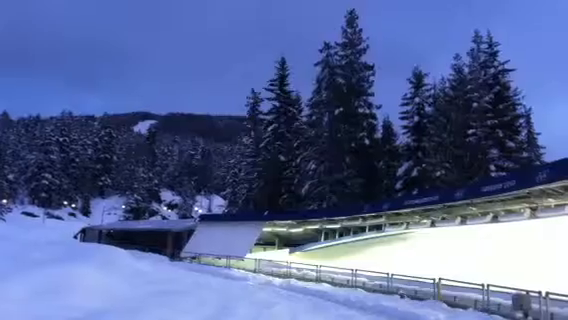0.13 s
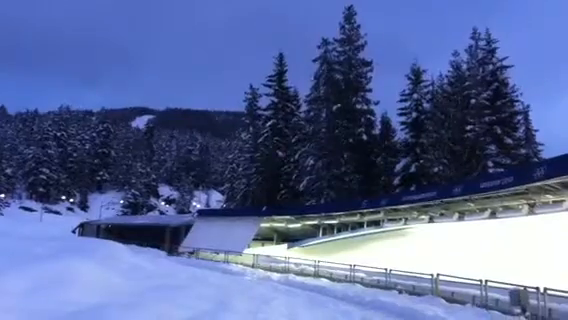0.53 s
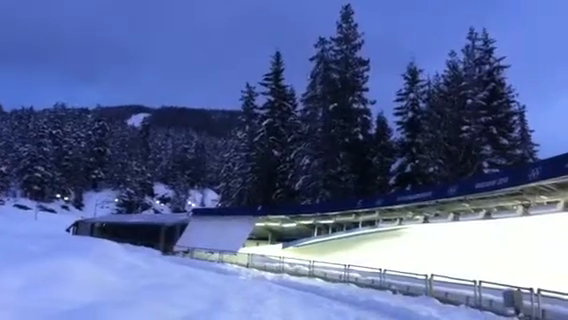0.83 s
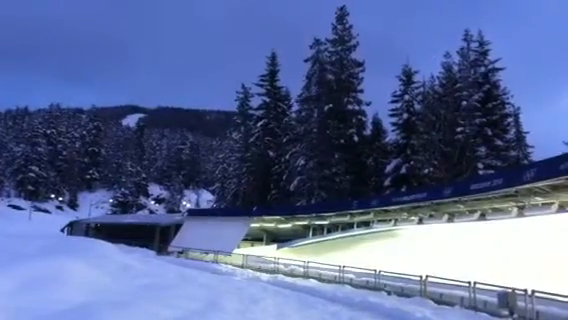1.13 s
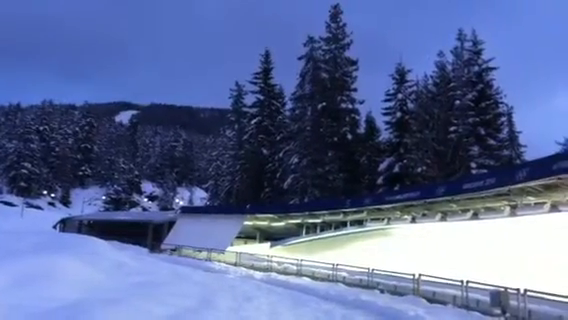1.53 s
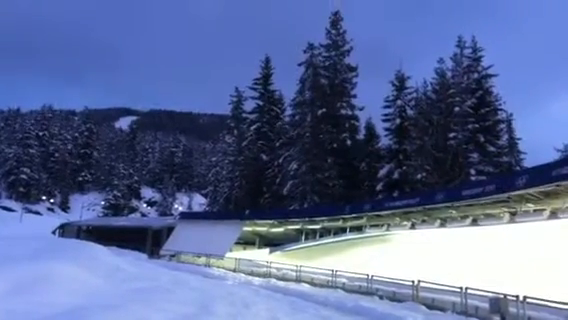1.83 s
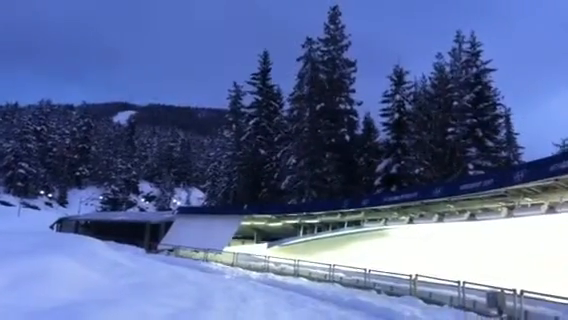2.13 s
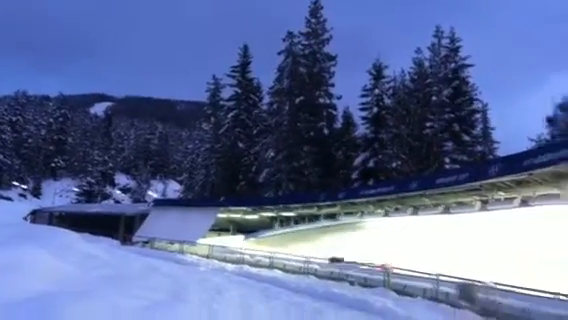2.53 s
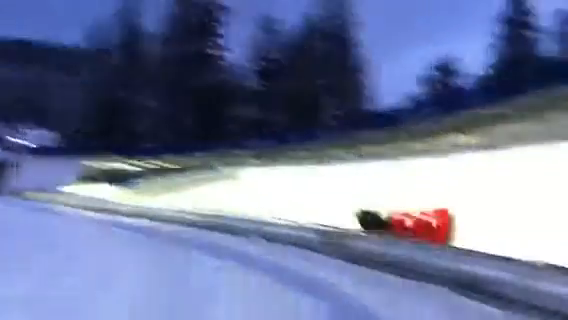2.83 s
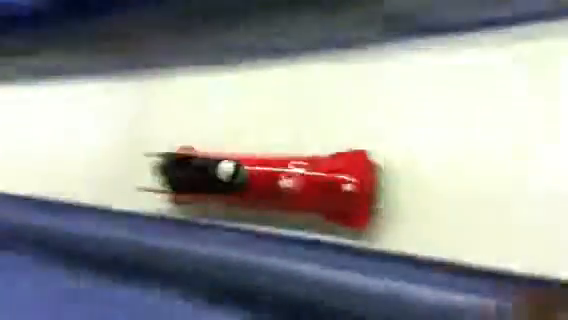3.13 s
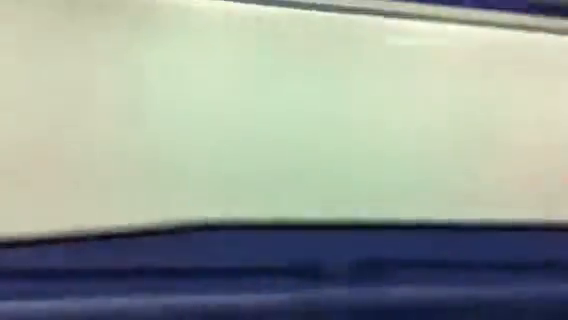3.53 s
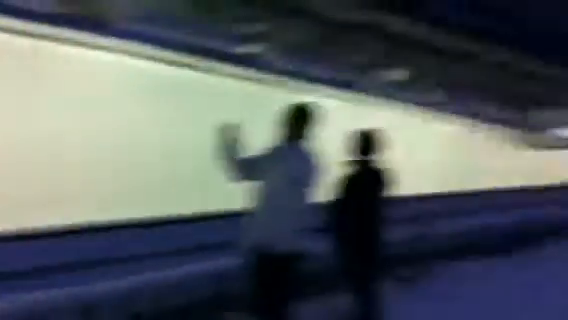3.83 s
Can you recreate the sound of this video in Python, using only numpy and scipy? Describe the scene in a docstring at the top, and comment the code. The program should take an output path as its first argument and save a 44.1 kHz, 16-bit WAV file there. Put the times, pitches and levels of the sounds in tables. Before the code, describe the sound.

A bobsled rumbles down an ice track, growing louder and sweeping past close by.

```python
"""A low, juddering rumble swells as a bobsled runs down a covered ice track, sweeps past and draws away.
Its runners chatter over rough ice: dense small bumps shake hull and track (rumble), grind the steel
(grind, rasp) and shave off ice (scrape, spray). Ridges in the ice jolt the hull into damped thumps.
The Doppler effect lowers the resonances as the sled passes. The microphone adds a thin hiss."""
import sys
import numpy as np
from scipy import signal
from scipy.fft import rfft, irfft
from scipy.io import wavfile
from scipy.ndimage import uniform_filter1d, map_coordinates

SR = 44100
rng = np.random.default_rng(int(sys.argv[2]) if len(sys.argv) > 2 else 0)


def dump(signal):
    """Clip the signal to [-1, 1] and save it as 16-bit WAV at the path in sys.argv[1]."""
    limited = np.clip(np.atleast_2d(signal).T, -1, 1)
    pcm = np.round(limited * 32767).astype(np.int16)
    wavfile.write(sys.argv[1], SR, pcm)


N = 176400
TIME_S = np.arange(N) / SR


def amp(db):
    return 10 ** (np.asarray(db) / 20)

def unit_rms(x):
    return x / np.sqrt(np.mean(x ** 2) + 1e-20)

def curve(rows, column=1):
    """Linear interpolation of one table column over time."""
    return np.interp(TIME_S, [r[0] for r in rows], [r[column] for r in rows])

def coloured(x, spectrum):
    """Spectral shaping by an envelope on a log-frequency axis, at unit rms."""
    points_hz, points_db = np.transpose(spectrum)
    hz = np.fft.rfftfreq(N, 1 / SR)
    gain_db = np.interp(np.log(hz + 1), np.log(points_hz + 1), points_db, -100, -100)
    return unit_rms(irfft(rfft(x) * amp(gain_db), N))

def resonance(x, hz, width_hz):
    """Forced resonance: two cascaded stages, each width_hz wide, follow the curve hz."""
    carrier = np.exp(2j * np.pi * np.cumsum(hz) / SR)
    pole = np.exp(-np.pi * width_hz / SR)
    for _ in range(2):
        x = unit_rms((carrier * signal.lfilter([1 - pole], [1, -pole], x / carrier)).real)
    return x

def with_modes(body, drive, modes, shift, lift_db=0):
    """Modal superposition on a broad body; the reversed drive acts as a second stream of bumps."""
    rings = sum(amp(db + lift_db) * resonance(drive[::-1], hz * shift, width) for hz, width, db in modes)
    return (body + rings) / np.sqrt(1 + sum(amp(db) ** 2 for _, _, db in modes))

def wobble(hz):
    """Random modulation: noise low-passed at hz, at unit rms."""
    b, a = signal.butter(2, hz, fs=SR)
    return unit_rms(signal.lfilter(b, a, rng.standard_normal(N)))

def bumps(per_s, spread_db):
    """Shot noise: rough ice gives irregular impulses of uneven size."""
    size = amp(spread_db * np.minimum(rng.exponential(1, N), 4)) * rng.choice([-1., 1.], N)
    return unit_rms(size * (rng.random(N) < per_s / SR))

def patchy(x, frames, bins):
    """Spectral modulation: louder and softer patches, 1 dB rms, over time and frequency."""
    spectra = signal.stft(x, nperseg=512, noverlap=384)[2]
    field = rng.standard_normal(spectra.shape[::-1]).T
    patch_db = unit_rms(uniform_filter1d(uniform_filter1d(field, bins, 0), frames, 1))
    return unit_rms(signal.istft(spectra * amp(patch_db), nperseg=512, noverlap=384)[1][:N])

def doppler(speed_m_s=26.1, nearest_m=4.46, nearest_s=3.45):
    """Doppler effect: the frequency ratio is above 1 on approach and below 1 in retreat."""
    along_m = speed_m_s * (TIME_S - nearest_s)
    receding_m_s = speed_m_s * along_m / np.hypot(along_m, nearest_m)
    return 1 / (1 + receding_m_s / 331)

def slowed(x, shift, share):
    """Time dilation: the whole spectrum sinks by a share (0-1) of the Doppler slide."""
    return map_coordinates(x, [np.cumsum((shift / shift[0]) ** share)], order=3)

def microphone_hiss(level_db=-71):
    """Self-noise: the microphone adds a steady white floor."""
    return amp(level_db) * rng.standard_normal(N)

# Spectrum of the ice spray: frequency_hz, gain_db
SPRAY_SPECTRUM = [(4350, 5.5), (6900, -7), (7500, -3), (8560, 2), (11000, 2), (12800, 0), (15500, -4.5)]
def spray():
    """Shot noise: tiny impulses of shaved ice merge into a high hiss."""
    return patchy(coloured(bumps(per_s=20000, spread_db=1), SPRAY_SPECTRUM), frames=12, bins=16)

# Spectrum of steel shaving ice: frequency_hz, gain_db
SCRAPE_SPECTRUM = [(1940, -7), (3300, -4.5), (4750, -1.5), (6600, -5.5), (7700, -14.5), (9750, -32)]
def scrape():
    """Abrasion: the runners shave the ice in a dense train of bright clicks."""
    return patchy(coloured(bumps(per_s=12000, spread_db=-4), SCRAPE_SPECTRUM), frames=12, bins=10)

# Spectrum of the rasp on approach: frequency_hz, gain_db
RASP_SPECTRUM = [(940, -26), (1600, -5.5), (1960, -3.5), (2180, -2.5), (2650, -7.5), (3500, -20),
                 (4550, -36)]
# Resonance in the rasp: pitch_hz, width_hz, level_db (relative to the broad rasp)
RASP_MODES = [(1930, 260, -6.5)]
# Changing prominence of that resonance: time_s, lift_db
RASP_MODE_LIFT = [(.13, -3), (1.65, -1), (1.69, 9), (1.73, 0), (1.76, 6.5), (1.93, 5.5), (2.0, 1),
                  (2.45, 3), (2.7, -8), (3.35, -2), (3.48, 5), (3.62, 0)]
def rasp(grit, shift):
    """Friction noise: fine roughness drives a broad band and one flickering resonance."""
    body = slowed(coloured(grit, RASP_SPECTRUM), shift, share=.6)
    body = patchy(body, frames=14, bins=5)
    lift_db = curve(RASP_MODE_LIFT) + 2.2 * wobble(hz=24.9)
    return with_modes(body, grit, RASP_MODES, shift, lift_db)

# Path of a hollow band: time_s, pitch_hz, level_db (relative to the grind)
HOLLOW_SWEEP = [(2.45, 1150, -20), (2.55, 1210, -17), (2.75, 1640, -3), (2.95, 1720, -27)]
def hollow_band(grit):
    """Swept resonance: a hollow band climbs as the sled swings into view."""
    return amp(curve(HOLLOW_SWEEP, column=2)) * resonance(grit[::-1], curve(HOLLOW_SWEEP), width_hz=230)

# Spectrum of steel grinding on ice: frequency_hz, gain_db
GRIND_SPECTRUM = [(240, -25), (400, -3.5), (440, -5.5), (584, -2), (1280, -9), (1800, -12.5), (2340, -27)]
# Runner modes at rest: pitch_hz, width_hz, level_db (relative to the broad grind)
RUNNER_MODES = [(622, 45, -13), (860, 50, -13), (1320, 50, -17)]
def grind(roughness, shift, behind_db=4):
    """Directivity: rough ice excites the runners, whose modes stand out more from behind the sled."""
    lift_db = behind_db * (shift.max() - shift) / np.ptp(shift)
    steel = with_modes(coloured(roughness, GRIND_SPECTRUM), roughness, RUNNER_MODES, shift, lift_db)
    return patchy(steel, frames=16, bins=4)

# Spectrum of the deepest boom: frequency_hz, gain_db
BOOM_SPECTRUM = [(26, -66), (45, -18), (91, -11.5), (140, -3), (180, -46)]
# Strength of the boom: time_s, level_db (relative to the rumble)
BOOM_LEVELS = [(.13, -19), (1.3, -36), (2.0, -11), (3.0, -20), (4.0, -19)]
def boom(knocks):
    """Low-frequency excitation: bumps give a deep band that waxes and wanes under the rumble."""
    return amp(curve(BOOM_LEVELS)) * coloured(knocks[::-1], BOOM_SPECTRUM)

# Spectrum of the shaking hull and track on approach: frequency_hz, gain_db
RUMBLE_SPECTRUM = [(79, -27), (135, -15), (162, -0.5), (188, -0.5), (243, 1.5), (344, -4.5), (520, -12.5),
                   (680, -45)]
# Hull modes at rest: pitch_hz, width_hz, level_db (relative to the broad rumble)
HULL_MODES = [(170, 33, -10), (222.8, 18.8, -12), (311, 87, -11.5)]
def rumble(knocks, shift):
    """Forced vibration: dense bumps shake hull and track and keep the hull's modes ringing."""
    body = slowed(coloured(knocks, RUMBLE_SPECTRUM), shift, share=.5)
    return with_modes(body, knocks, HULL_MODES, shift)

# Jolts over ridges: start_s, rumble_lift_db, grind_rasp_lift_db, scrape_spray_lift_db,
# blow_db (relative to the rumble)
RIDGE_JOLTS = [(1.755, 2, 0.5, 3, 1), (2.207, 5, 4, 3, 9.5), (2.308, 3, -4.5, -4, 10.5),
               (2.356, 1.5, 0, 0, 6.5), (2.429, 7.5, 3, 7, 11.5), (2.852, 1.5, -3, 3, 5.5),
               (2.941, 6, -3.5, 5.5, 4.5), (3.505, 5.5, -0.5, -3.5, 5.5), (3.601, 6, 2.5, 4, 7)]
def jolt_lifts_db(rise_s=.0054, fall_s=.033):
    """Transient excitation: each jolt briefly shifts the levels of the five running layers."""
    lifts_db = np.zeros((5, N))
    for start_s, low, mid, high, _ in RIDGE_JOLTS:
        age_s = np.maximum(TIME_S - start_s, 0)
        pulse = (1 - np.exp(-age_s / rise_s)) * np.exp(-age_s / fall_s)
        lifts_db += np.outer([low, mid, mid, high, high], pulse)
    return lifts_db

def thumps(shift, rise_s=.009):
    """Damped free vibration: each jolt strikes the hull once, and wider modes die away sooner."""
    out, rumble_db = np.zeros(N), curve(PASS_LEVELS)
    age_s = np.arange(SR // 4) / SR
    attack = 1 - np.exp(-(age_s / rise_s) ** 2)
    first_mode_db = HULL_MODES[0][2]
    for start_s, *_, blow_db in RIDGE_JOLTS:
        at = round(start_s * SR)
        rings = sum(amp(db - first_mode_db) * np.exp(-age_s * width)
                    * np.sin(2 * np.pi * hz * shift[at] * age_s) for hz, width, db in HULL_MODES)
        out[at:at + len(age_s)] += (amp(rumble_db[at] + blow_db) * attack * rings)[:N - at]
    return out

# Base levels as the sled nears and leaves: time_s, rumble_db, grind_db, rasp_db, scrape_db, spray_db
PASS_LEVELS = [(.13, -51.5, -60.5, -69.5, -79, -86), (.3, -47.5, -53.5, -64, -78.5, -92),
               (.55, -49.5, -57.5, -65, -76, -88), (.68, -55, -59.5, -66.5, -78, -90),
               (.88, -47.5, -59, -66, -80, -86), (1.01, -52.5, -56.5, -62.5, -76, -86),
               (1.12, -47, -59, -63.5, -76.5, -85), (1.3, -48.5, -58, -64, -78, -85),
               (1.51, -47.5, -53, -59, -71.5, -84), (1.73, -47.5, -54.5, -57, -71, -82),
               (1.77, -45.5, -50, -54.5, -65.5, -80), (1.92, -47.5, -50.5, -55.5, -69.5, -76),
               (2.15, -42, -47, -53.5, -65, -69), (2.21, -40, -45, -51, -62.5, -71),
               (2.33, -36, -40, -47, -59, -64.5), (2.46, -34.5, -41, -43, -57, -64),
               (2.56, -37.5, -36.5, -45, -54.5, -58), (2.7, -30.5, -37.5, -45, -55.5, -56.5),
               (2.82, -27, -34.5, -40, -53.5, -56), (2.87, -25.5, -28.5, -38, -51, -54.5),
               (2.99, -30.5, -36, -44, -53, -52.5), (3.16, -23, -29.5, -37, -47.5, -47),
               (3.3, -21, -29, -35, -44.5, -42), (3.41, -17, -27, -34, -42.5, -40),
               (3.53, -16, -24, -30.5, -38, -38.5), (3.65, -22, -27.5, -37.5, -45.5, -44),
               (3.77, -24, -30.5, -37, -50, -47), (3.82, -19.5, -30, -36.5, -47, -45.5),
               (4.0, -27.5, -33.5, -38, -49, -51.5)]
def sled(shift):
    """Common amplitude modulation: five layers swell with the pass and share one judder and chatter."""
    judder, chatter = wobble(hz=24), wobble(hz=60)
    knocks = bumps(per_s=3000, spread_db=3)
    roughness = bumps(per_s=8000, spread_db=2)
    grit = bumps(per_s=9000, spread_db=1.5)
    layers = np.array([rumble(knocks, shift) + boom(knocks),
                       grind(roughness, shift) + hollow_band(grit),
                       rasp(grit, shift), scrape(), spray()])
    pass_db = np.array([curve(PASS_LEVELS, column) for column in range(1, 6)])
    judder_db = np.outer([.38, .29, .22, .24, .17], judder)
    chatter_db = np.outer([.76, .41, 1, .65, 1], chatter)
    return (layers * amp(pass_db + jolt_lifts_db() + judder_db + chatter_db)).sum(0)

def scene():
    """Superposition: running noise and thumps add in one channel under the same Doppler shift."""
    shift = doppler()
    return (sled(shift) + thumps(shift))[None]

def record(dry, start_s=.1188, low_cut_hz=83, high_cut_hz=15780):
    """Band limiting: sled and hiss begin abruptly and lose their deepest bass and highest treble."""
    onset = np.clip((TIME_S - start_s) / .0047, 0, 1)
    heard = (dry + microphone_hiss()) * onset
    heard = signal.sosfilt(signal.butter(2, low_cut_hz, "high", fs=SR, output="sos"), heard)
    low_pass = signal.firwin(1023, high_cut_hz, window=("kaiser", 9), fs=SR)
    return signal.oaconvolve(heard, low_pass[None], "same")


dry = scene()
out = record(dry)
dump(out)
```